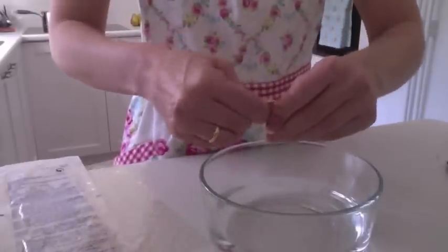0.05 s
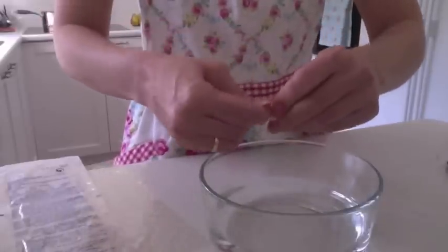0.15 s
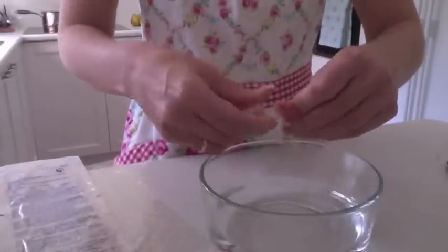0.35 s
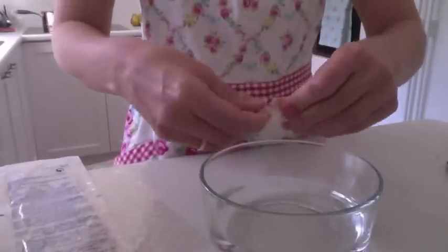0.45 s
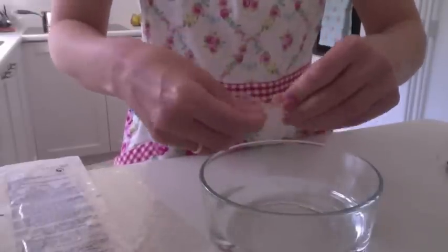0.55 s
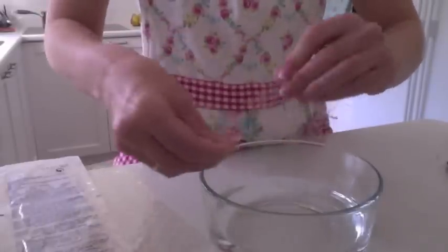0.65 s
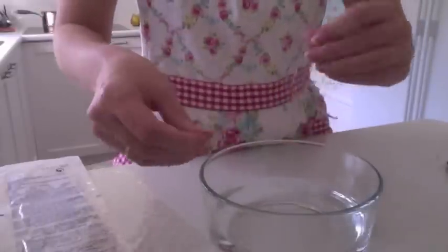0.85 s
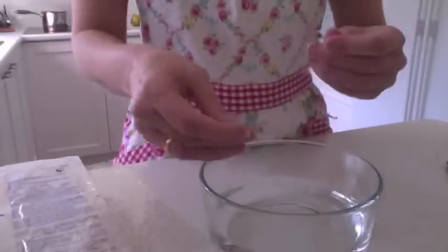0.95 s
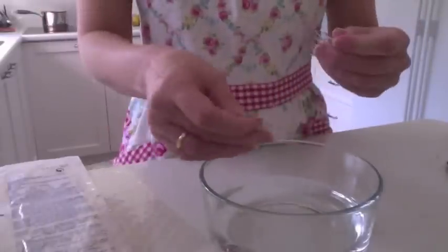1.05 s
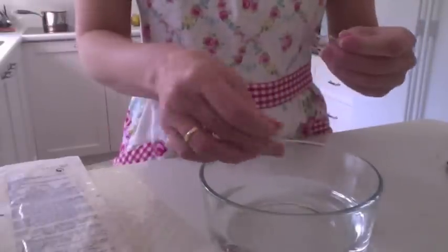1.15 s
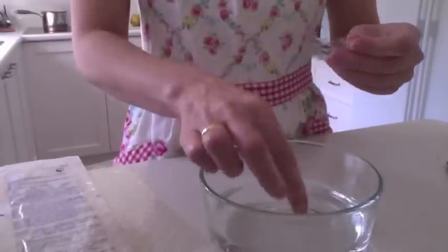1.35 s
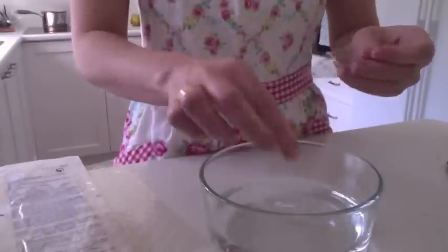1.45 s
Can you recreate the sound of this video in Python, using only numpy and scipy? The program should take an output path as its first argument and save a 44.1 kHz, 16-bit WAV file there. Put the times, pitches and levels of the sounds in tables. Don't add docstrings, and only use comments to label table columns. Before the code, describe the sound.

A dry, brittle gelatin sheet creaks and snaps sharply between fingers, crackles lightly, then tears in a rapid burst of cracks; sparse faint ticks follow. Close small microphone, echoing hard kitchen, quiet hush and thin whine.

```python
import sys
import numpy as np
from scipy import signal
from scipy.fft import rfft, irfft
from scipy.io import wavfile
from scipy.ndimage import uniform_filter1d

SR = 44100
rng = np.random.default_rng(int(sys.argv[2]) if len(sys.argv) > 2 else 0)


def to_wav(s):
    ch = np.atleast_2d(s).T
    pcm = np.round(np.clip(ch, -1, 1) * 32767)
    wavfile.write(sys.argv[1], SR, pcm.astype(np.int16))


def undo_db(level):
    steps = np.asarray(level, float) / 20
    return 10 ** steps


N = 66150
LEAD = 4410


def rms1(x):
    return x / np.sqrt(np.mean(x ** 2))


def shape(x, points):
    hz, db = np.array(points, float).T
    f = np.maximum(np.fft.rfftfreq(len(x), 1 / SR), 1)
    return irfft(rfft(x) * undo_db(np.interp(np.log(f), np.log(hz), db)), len(x))


def peak(x, hz, width_hz):
    return signal.lfilter(*signal.iirpeak(hz, hz / width_hz, fs=SR), x)


def band(x, lo_hz, hi_hz):
    y = signal.sosfilt(signal.butter(3, [lo_hz, hi_hz], "band", fs=SR, output="sos"), x)
    return y / np.sqrt(np.sum(y ** 2))


# frequency in Hz, level in dB per Hz.
HUSH_COLOUR = [(30, -40), (160, -10), (450, -14), (1300, -10.5), (2200, -15.5), (7000, -27.5), (13000, -63),
               (14500, -90)]


def quiet_floor():
    hush = rms1(shape(rng.standard_normal(N), HUSH_COLOUR))
    whine_hz, whine_width_hz = 1350, 150
    tone = np.sin(2 * np.pi * whine_hz * np.arange(N) / SR)
    flutter = rms1(band(rng.standard_normal(N), whine_hz - whine_width_hz, whine_hz + whine_width_hz))
    hiss = rms1(band(rng.standard_normal(N), 3500 - 380, 3500 + 380))
    return undo_db(-58.5) * hush + undo_db(-63.5) * (tone + 0.5 * flutter) + undo_db(-66.5) * hiss


# delay in seconds, level in dB.
ECHOES = [
    (.0032, -7.5),
    (0.00905, -9.5),
    (0.01, -22.5),
]
# frequency in Hz, time to fade by 60 dB in seconds, level in dB.
ROOM_TAIL = [(200, 0.95, -19), (480, 0.34, -13), (1390, 0.32, -8), (3000, 0.37, -7), (6000, 0.44, -17),
             (10050, 0.27, -1.5), (15000, 0.1, -3.5)]


def kitchen(x):
    t = np.arange(SR // 2) / SR
    response = np.zeros(len(t))
    response[0] = 1
    smear = rng.standard_normal(len(t))
    for delay_s, db in ECHOES:
        response += undo_db(db) * smear * np.exp(-((t - delay_s) / 0.00036) ** 2) / 6.07
    hz, t60_s, level_db = np.array(ROOM_TAIL).T
    rise = 1 - np.exp(-t / 0.018)
    for f in 150 * 2 ** np.arange(0, 7, .5):
        sos = signal.butter(2, [f / 2 ** 0.34, f * 2 ** 0.29], "band", fs=SR, output="sos")
        tail = rms1(signal.sosfilt(sos, rng.standard_normal(len(t))))
        fade = np.exp(-np.log(1000) * t / np.interp(np.log(f), np.log(hz), t60_s))
        level = undo_db(2 + np.interp(np.log(f), np.log(hz), level_db))
        response += level * tail * fade * rise * np.sqrt(f / SR) / 32
    return signal.fftconvolve(x, response)[LEAD:LEAD + N]


# frequency in Hz, width in Hz, share added (minus: dip).
MIC_COLOUR = [(3600, 850, 0.21), (8186, 720, -0.26), (1153, 68, -0.85)]


def mic(x):
    x = signal.sosfilt(signal.butter(2, 240, "high", fs=SR, output="sos"), x)
    for hz, width_hz, share in MIC_COLOUR:
        x = x + share * peak(x, hz, width_hz)
    return x


# start in seconds, level in dB, frequency in Hz.
BENDS = [
    (0.106, -22.5, 395),
    (0.3154, -38, 480),
    (0.3413, -40, 329),
    (0.589, -23.5, 414),
    (.617, -25.5, 391),
    (.637, -23, 426),
    (.683, -32.5, 387),
]


def bends():
    t60_s, rise_s = 0.035, 0.0012
    out = np.zeros(N + LEAD)
    for start_s, db, hz in BENDS:
        t = np.maximum((np.arange(N + LEAD) - LEAD) / SR - start_s, 0)
        swell = (1 - np.exp(-t / rise_s)) * np.exp(-np.log(1000) * t / t60_s)
        out += undo_db(db) * np.sin(2 * np.pi * hz * t) * swell
    return out


# time in seconds, level in dB.
RIP_LEVEL = [
    (0.584, -46),
    (0.599, -29.5),
    (.62, -29),
    (.66, -25.5),
    (0.698, -31),
    (.708, -72),
]
# frequency in Hz, level in dB per Hz.
RIP_COLOUR = [(120, -51), (200, -25.5), (671, -17), (1160, -11), (2210, -8), (2510, -22), (3560, -9),
              (16000, -33.5)]


def rip():
    n = N + LEAD
    cracks_per_s, thud_hz = 4000, 165.5
    time_s, level_db = np.array(RIP_LEVEL).T
    level = undo_db(np.interp((np.arange(n) - LEAD) / SR, time_s, level_db, left=-200, right=-200))
    cracks = (rng.random(n) < cracks_per_s / SR) * np.sign(rng.standard_normal(n))
    crackle = level * rms1(shape(cracks, RIP_COLOUR))
    push = rms1(band(rng.standard_normal(n), thud_hz / 1.6, thud_hz * 1.57))
    return crackle, uniform_filter1d(level, 600) * undo_db(-19.5) * push


# frequency in Hz, width in Hz, level in dB.
FLAP_MODES = [(690, 142, 8.5), (1050, 150, 5.5)]


def sheet_flap(t):
    give = np.exp(-t / 0.000098)
    flap = np.zeros(len(t))
    for k, (hz, width_hz, db) in enumerate(FLAP_MODES):
        flap += (-1) ** k * undo_db(db) * peak(give, hz, width_hz)
    return band(flap, 480, 1284)


def crack_clusters(table, fading_s, broad_db, octaves):
    length = 1500
    t = np.arange(length) / SR
    out = np.zeros(N + LEAD + length)
    for start_s, db, flap_db, sizzle_db, ring_hz in table:
        strength = rng.standard_normal(length)
        cracks = strength * (rng.random(length) < .3) * np.exp(-t / fading_s)
        cracks[0] = 1.6
        ring = band(cracks, ring_hz / 2 ** octaves, ring_hz * 2 ** octaves)
        broad = band(cracks, 2600, 7290)
        low = sheet_flap(t) + undo_db(-4.5) * band(cracks, 1254, 2380)
        edge_hz = 15560 * 2 ** (0.034 * np.tanh(strength[-2]))
        sizzle = band(cracks + 0.5 * peak(cracks, 10550 * edge_hz / 15560, 1300), 9300, 15560)
        snap = undo_db(-2) * ring + undo_db(-4 + broad_db) * broad + undo_db(flap_db) * low + undo_db(sizzle_db) * sizzle
        i = int(start_s * SR) + LEAD
        out[i:i + length] += undo_db(db + 5.5) * snap
    return out[:N + LEAD]


# start in seconds, ring level in dB, flap and sizzle in dB against the ring, ring centre in Hz.
EARLIER = [
    (-0.093, -0.5, -26, -31.5, 3400),
]


def earlier_snap():
    return crack_clusters(EARLIER, 0.0019, -4, 0.24)


# start in seconds, ring level in dB, flap and sizzle in dB against the ring, ring centre in Hz.
CREAK = [
    (.002, -30.5, 2.5, -18, 3450),
    (.013, -38.5, 0.5, -24.5, 3500),
    (.023, -25.5, -7, -24.5, 3600),
    (.032, -43.5, -10.5, -2.5, 3600),
    (.040, -28.5, -6, -19, 4100),
    (.051, -33, 0, -10.5, 4100),
    (.065, -43.5, 3, -11, 3500),
    (.074, -32, 2.5, -15.5, 4340),
    (.086, -49, 9, -11.5, 4200),
    (.095, -29.5, -8, -13.5, 4370),
]


def creak():
    return crack_clusters(CREAK, 0.0016, -5, 0.2)


# start in seconds, ring level in dB, flap and sizzle in dB against the ring, ring centre in Hz.
TICKS = [
    (1.017, -53, -19, -7, 6000),
    (1.127, -45.5, -19.5, -12, 4300),
    (1.190, -22, -45, -16, 3710),
    (1.1901, -22, -31, -50, 6640),
    (1.3225, -37, -38.5, -27, 6320),
    (1.397, -36.5, -32.5, -12.5, 4150),
    (1.447, -69.5, -30.5, -7.5, 6000),
]


def late_ticks():
    return crack_clusters(TICKS, 0.00086, -14, 0.2)


# start in seconds, ring level in dB, flap and sizzle in dB against the ring, ring centre in Hz.
TEAR = [(.5893, -6, -5, -7, 3600), (.5925, -3.5, -20, -15, 4620), (.6169, -6, -6.5, -7.5, 3690),
        (.620, -9.5, -27, -39, 4470), (.637, -7.5, -8.5, -3, 4860), (.6405, -20, 9, -21, 3440),
        (.6445, -8, -42, -27, 3100), (.654, -5, -14.5, -5, 3730), (.662, -15, -9, -13, 4100),
        (.677, -7, -18, -7, 5000), (.683, -12, 1, -29, 3000), (.697, -7.5, -13.5, -5, 5180),
        (.700, -11, -26, -23, 3600)]


def tear():
    return crack_clusters(TEAR, 0.0019, 4.5, 0.34)


# start in seconds, ring level in dB, flap and sizzle in dB against the ring, ring centre in Hz.
SNAPS = [(.1061, -1, -5, 0, 4970), (.109, -4.5, -20.5, -18, 4070), (.130, -12, -8.5, 4, 3900),
         (.2216, -16.5, -15, -10, 4800), (.300, -51.5, 10, 18, 4500), (.3143, -20.5, -24, -13, 3890),
         (.3419, -14, 4.5, -42, 3980), (.346, -17.5, -10, -39, 3500), (.369, -20, -8, -23, 2600),
         (.432, -64, -8, 13.5, 6000), (.455, -59.5, 26.5, -19, 3000), (.5032, -21.5, -24, -10.5, 6000),
         (.542, -15, -1.5, -9.5, 4380), (.560, -14, -14, -8.5, 5370), (.1302, -5.5, -22.5, -23.5, 1510),
         (.3145, -16.5, -9, -39, 1610), (.3423, -18, 2.5, -20, 1390), (.380, -29.5, 4.5, -34, 2470),
         (.1235, -30.5, -19.5, -14, 8800)]


def bending_snaps():
    return crack_clusters(SNAPS, 0.0026, 1.2, 0.37)


def scene():
    crackle, thud = rip()
    sheet = bending_snaps() + tear() + creak() + earlier_snap() + crackle + bends()
    ticks = late_ticks()
    tick_room = 0.55
    wet = kitchen(mic(sheet + tick_room * ticks) + thud)
    near = (1 - tick_room) * mic(ticks)[LEAD:]
    return (wet + near + quiet_floor())[None]


def roll_off(x):
    return signal.sosfilt(signal.butter(12, 16990, fs=SR, output="sos"), x)


def record(dry):
    limited = np.tanh(0.99 * dry) / 0.82
    clean = signal.sosfilt(signal.butter(1, 45, "high", fs=SR, output="sos"), limited)
    mixed = signal.sosfilt(signal.ellip(8, .3, 60, 15900, fs=SR, output="sos"), clean)
    return roll_off(mixed)


dry = scene()
out = record(dry)
to_wav(out)
```